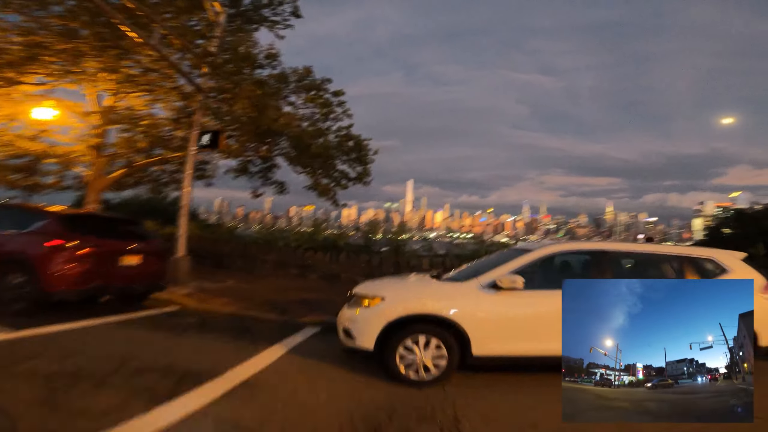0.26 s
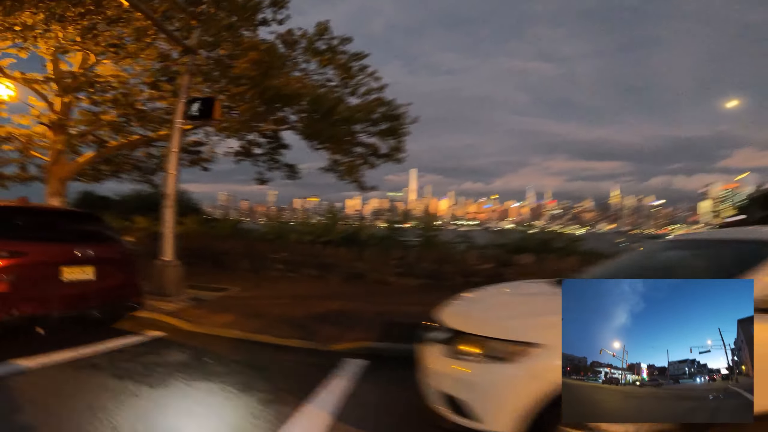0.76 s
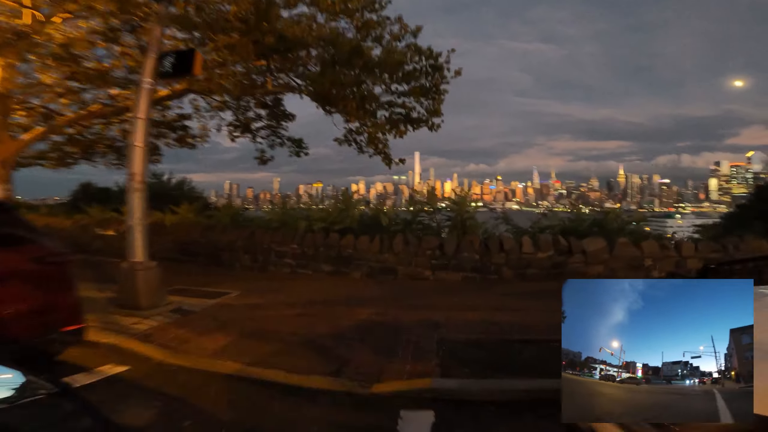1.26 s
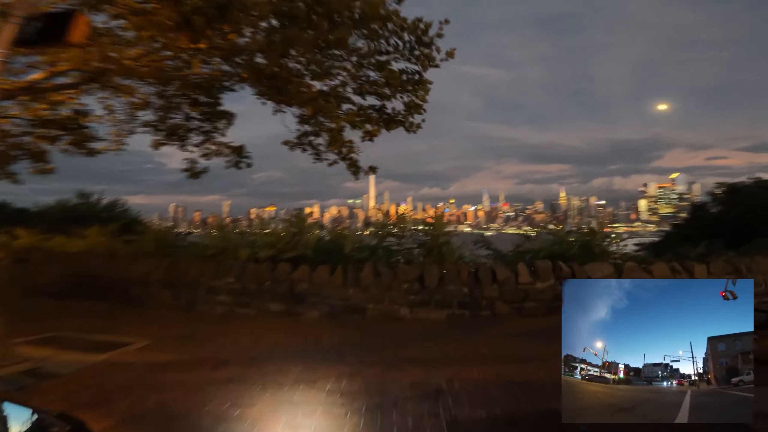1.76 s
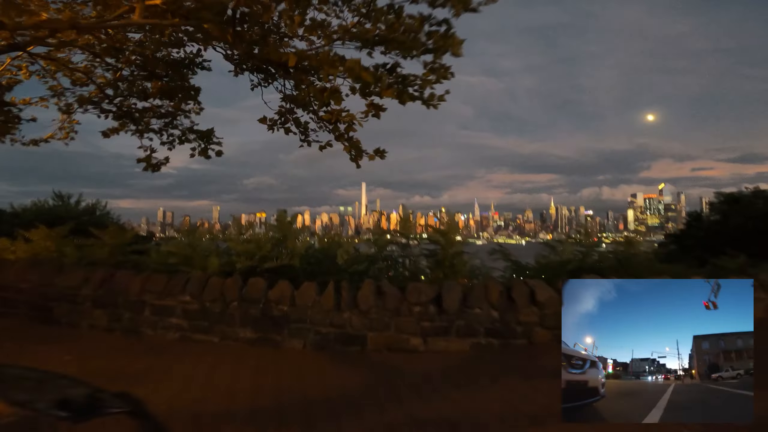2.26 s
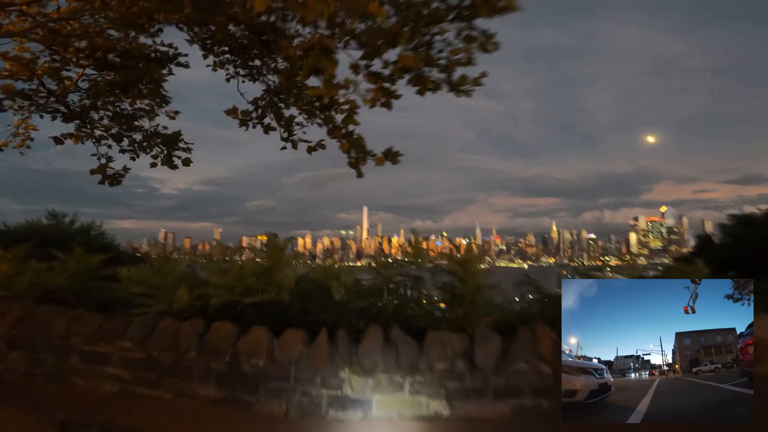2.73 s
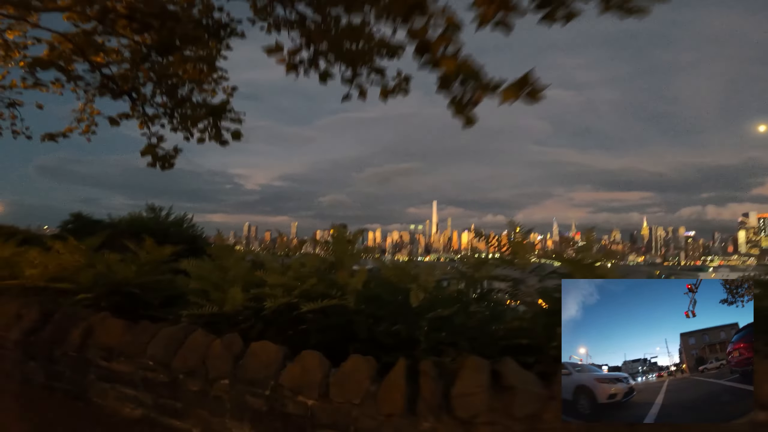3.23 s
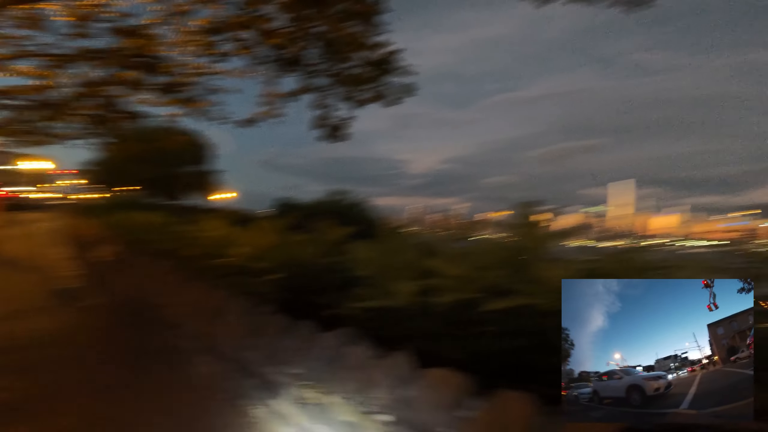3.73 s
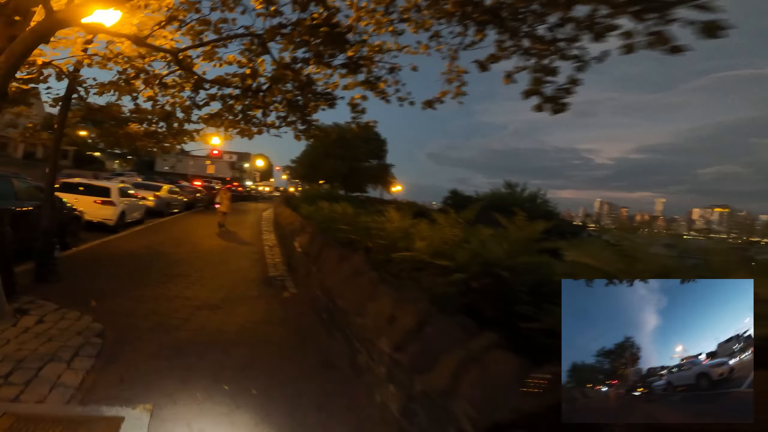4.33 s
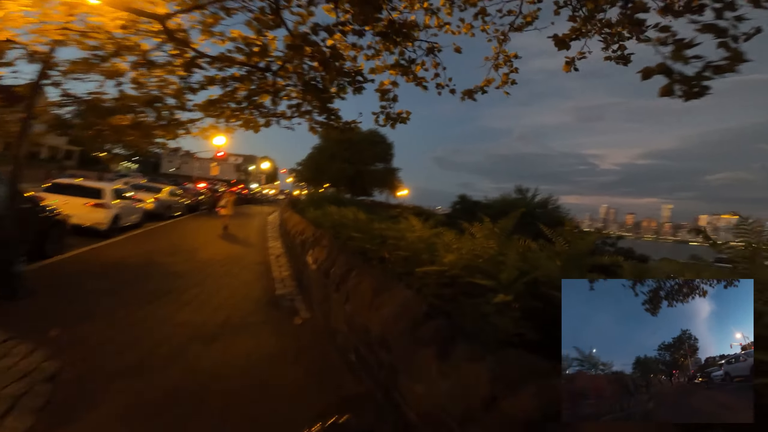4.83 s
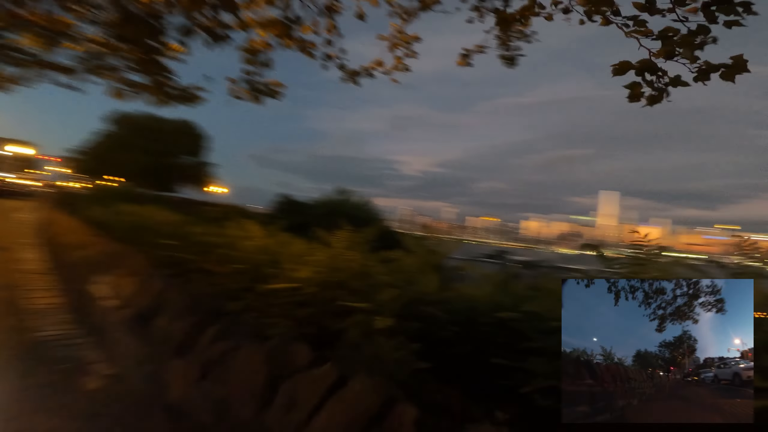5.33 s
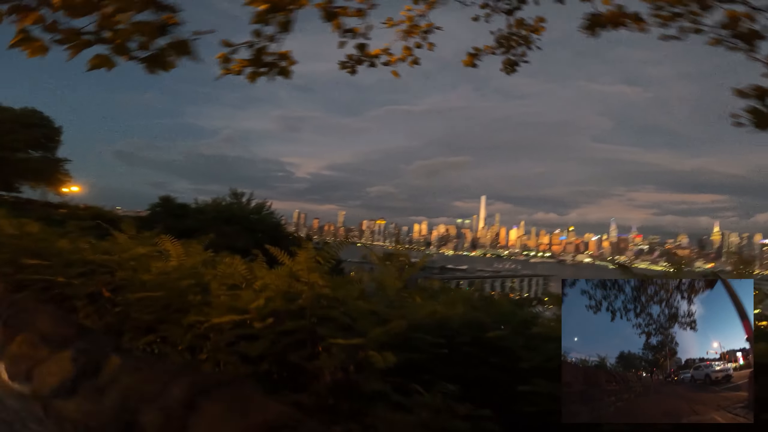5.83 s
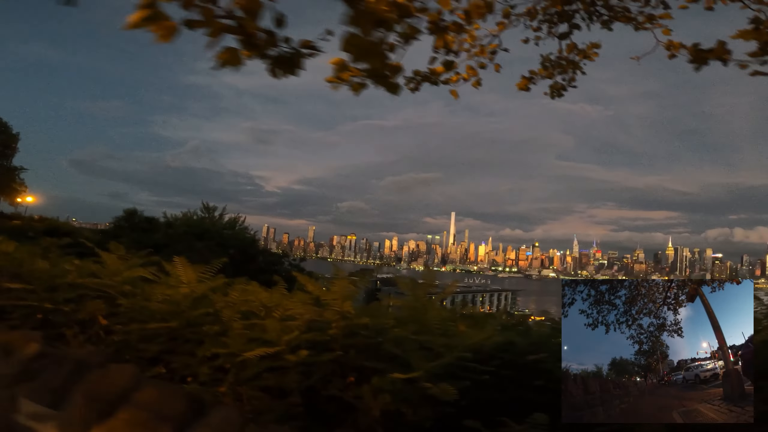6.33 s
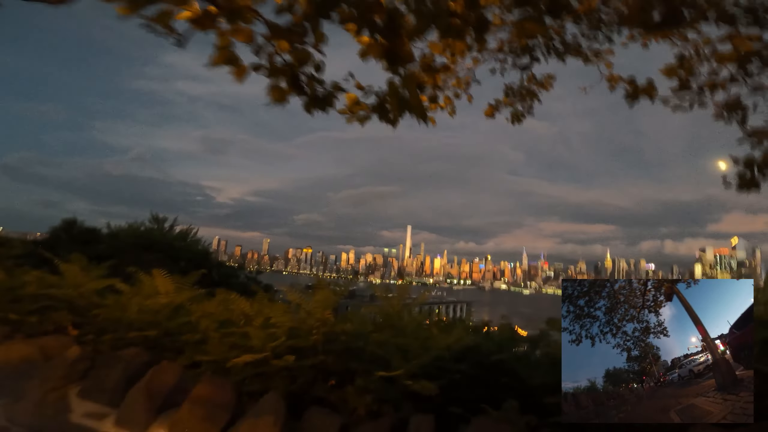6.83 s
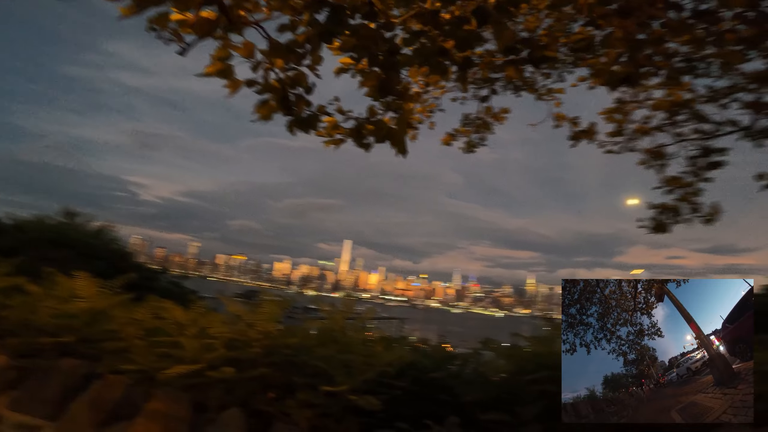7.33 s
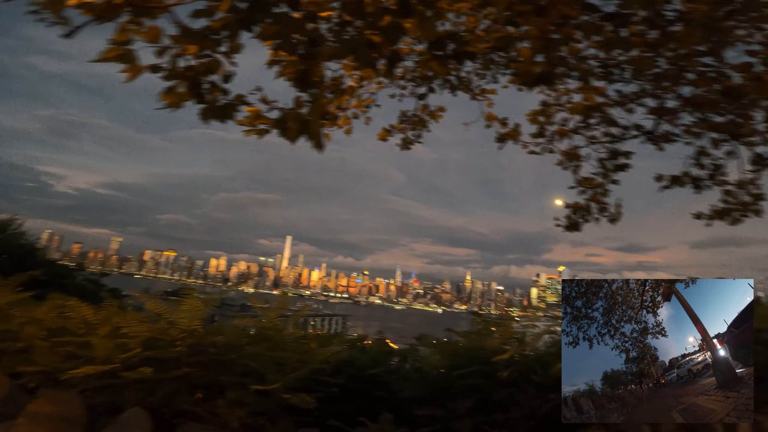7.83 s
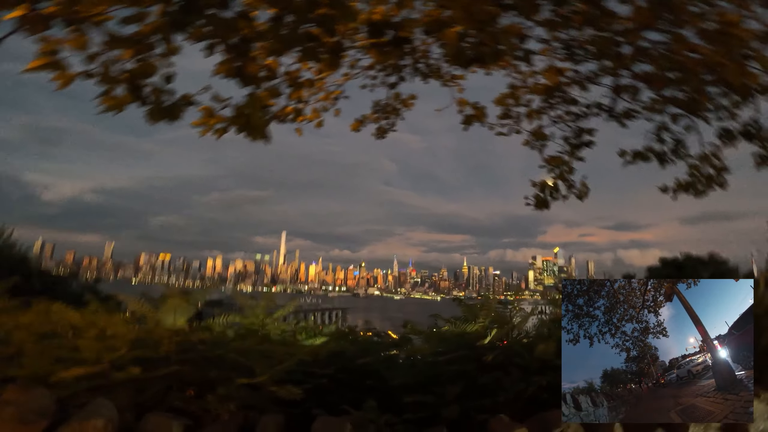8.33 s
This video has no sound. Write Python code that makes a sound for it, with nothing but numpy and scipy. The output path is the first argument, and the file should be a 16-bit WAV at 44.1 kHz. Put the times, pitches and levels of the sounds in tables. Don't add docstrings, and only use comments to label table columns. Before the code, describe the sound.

Close on a bike outdoors, a loud pure brake squeal opens, already under way; a second, harder one follows just after one second, with thin, higher beaded squeals trailing. A short squeal returns before four seconds with a sharp burst of metal clacks and pings. Clicks, frame knocks, faint ratchet ticks, a grainy pad scrape and a final snap follow. A low diesel idles throughout under wind and street rumble, dipping after each loud squeal.

```python
import sys
import numpy as np
from scipy import signal
from scipy.io import wavfile
from scipy.ndimage import uniform_filter1d

SR = 44100
rng = np.random.default_rng(int(sys.argv[2]) if len(sys.argv) > 2 else 0)


def inscribe(sig):
    pcm = np.round(np.clip(np.atleast_2d(sig).T, -1, 1) * 32767)
    wavfile.write(sys.argv[1], SR, pcm.astype(np.int16))


def how_loud(loudness_db):
    steps = np.asarray(loudness_db, float) / 20
    return 10 ** steps


N = 378378

# (time [s], pitch [Hz], level [dB], octave [dB])
FRONT_SQUEALS = [
    [(0, 1530, -16, -25), (.064, 1530, -16, -28), (.085, 1525, -21, -18), (.108, 1511, -17.5, -30),
     (.142, 1530, -13.5, -30), (.168, 1515, -20.5, -23.5), (.208, 1510, -24.5, -36), (.235, 1525, -40, -45),
     (.31, 1500, -57, -58)],
    [(1.32, 1557, -41.5, -60), (1.346, 1558, -14.5, -34), (1.372, 1541, -11.5, -35),
     (1.392, 1530, -15.5, -32.5), (1.44, 1529, -14.5, -39.5), (1.472, 1513, -17, -28.5),
     (1.488, 1523, -20.5, -41), (1.515, 1506, -27, -33), (1.555, 1520, -43, -56)],
]
# (time [s], pitch [Hz], level [dB], octave [dB])
RELEASE_SQUEAKS = [
    [(.17, 1335, -54.5, -73), (.21, 1344, -39, -70), (.245, 1335, -48, -70), (.29, 1330, -65, -85)],
    [(1.49, 1345, -54, -75), (1.53, 1335, -35, -54), (1.565, 1327, -27, -46), (1.585, 1320, -43, -60),
     (1.605, 1316, -32, -58), (1.63, 1320, -41, -62), (1.67, 1305, -55, -78)],
]
DISC_FED_DB = [-2.5, 0]
# (pitch [Hz], level [dB], t60 [s])
DISC_MODES = [(1555, 20.5, 0.9), (1614, 6, 2.3), (1500, 10, 0.99)]
# (time [s], held [s], level [dB])
PAD_HISS = [
    (0.0, 0.22, -50),
    (1.351, 0.17, -53),
]
# (time [s], held [s], pitch [Hz], level [dB], octave re level [dB])
REAR_CHIPS = [
    (.47, 0.017, 2390, -44, -30),
    (.92, 0.0083, 2430, -45, -30),
    (.965, 0.0065, 2380, -45.5, -30),
]
# (time [s], pitch [Hz], level [dB], octave [dB])
REAR_SQUEALS = [
    [(1.11, 2471, -55, -72), (1.16, 2470, -45, -62), (1.196, 2476, -32, -49), (1.235, 2467, -43, -59),
     (1.252, 2486, -33, -48), (1.285, 2450, -48, -64), (1.298, 2460, -41, -86), (1.318, 2500, -43, -83),
     (1.335, 2482, -58, -71)],
    [(1.53, 2405, -60, -78), (1.566, 2405, -45, -77), (1.65, 2426, -45.5, -78), (1.672, 2380, -48, -52.5),
     (1.708, 2380, -47, -64), (1.75, 2380, -37, -57), (1.766, 2403, -45, -57), (1.788, 2400, -43, -56),
     (1.8, 2390, -47, -57)],
    [(1.79, 2405, -45, -58), (1.804, 2380, -42, -51), (1.83, 2396, -40, -60), (1.85, 2400, -34.5, -56),
     (1.868, 2402, -48, -69), (1.906, 2400, -35, -65), (1.918, 2403, -47, -59), (1.94, 2407, -39, -56),
     (1.98, 2370, -45, -60)],
    [(1.97, 2380, -49, -63), (1.996, 2400, -35.5, -58), (2.016, 2380, -42, -53),
     (2.076, 2397, -29.5, -46.5), (2.1, 2425, -46, -55), (2.116, 2374, -36, -64), (2.122, 2430, -34, -82),
     (2.13, 2420, -40, -54), (2.17, 2390, -47, -75)],
    [(2.16, 2430, -43, -73), (2.176, 2420, -50, -79), (2.184, 2380, -47, -56), (2.21, 2333, -36, -56),
     (2.262, 2440, -60, -86), (2.29, 2423, -50, -69), (2.306, 2376, -47, -87), (2.338, 2384, -46, -75),
     (2.38, 2413, -59, -85)],
    [(3.72, 2350, -51, -64), (3.75, 2399, -34, -63), (3.774, 2393, -27.5, -46), (3.804, 2395, -32, -46),
     (3.856, 2400, -26.5, -48), (3.896, 2440, -32, -50), (3.906, 2370, -41, -67), (3.908, 2420, -30, -52),
     (3.915, 2467, -36, -44)],
]
# (time [s], held [s], pitch [Hz], level [dB])
PAD_WHISTLES = [
    (.772, .01, 13220, -63),
    (1.074, 0.024, 13200, -60),
    (1.274, 0.023, 13200, -60.5),
    (1.94, .05, 13220, -75),
    (5.77, .03, 13200, -65),
    (6.102, .008, 13300, -52),
    (6.25, .04, 13260, -47),
    (6.33, .06, 13400, -75),
]
# (time [s], held [s], pitch [Hz], level [dB])
SPRING_CHIRPS = [(4.13, .03, 5450, -67), (4.3, .025, 5450, -64), (4.345, .012, 5200, -54),
                 (4.366, .012, 5400, -58), (4.49, .006, 5500, -63), (4.565, .045, 5200, -59),
                 (4.59, .015, 5450, -60), (4.62, .015, 5350, -62), (4.65, .045, 5420, -60),
                 (4.708, .01, 5330, -58), (4.73, .025, 5330, -59), (4.765, .015, 5240, -64),
                 (4.875, .012, 5460, -55), (5.395, .03, 5450, -65), (5.515, .008, 5500, -60),
                 (5.56, .04, 5500, -66), (6.885, .014, 5500, -56)]
# (time [s], held [s], mode [Hz], level [dB])
PAD_DRAGS = [
    (7.008, .24, 2600, -47),
    (7.272, 0.18, 2620, -50.5),
    (7.44, .05, 2580, -54.5),
    (7.535, .065, 2575, -52),
]
# (time [s], held [s], mode [Hz], level [dB])
DRAG_SIDE_MODES = [
    (7.01, .3, 5020, -61),
    (7.36, .12, 5050, -59),
    (7.05, .5, 3942, -62),
    (7.01, .28, 8450, -68),
    (6.96, .02, 6300, -59),
]
# (time [s], peak [dB], ring [Hz])
LEVER_TICKS = [
    (0.5193, -45, 2930),
    (0.6972, -34.5, 3400),
    (0.837, -25, 3200),
    (1.77, -25.5, 2400),
    (4.2052, -16.5, 3440),
    (4.4114, -20, 3480),
    (4.895, -17.5, 3350),
    (4.909, -27.5, 2450),
    (5.8485, -44.5, 2634),
    (6.96, -41, 2620),
]
# (time [s], peak [dB], ring [Hz])
RATCHET_PIPS = [
    (.204, -32, 3320),
    (3.867, -33, 3500),
    (4.134, -29.5, 2890),
    (4.1639, -29, 2660),
    (4.1845, -27, 3120),
    (4.2577, -31, 3310),
    (4.721, -29.5, 2700),
    (6.037, -30, 2579),
    (8.032, -39, 3508),
]
# (time [s], peak [dB], ring [Hz])
CABLE_TAPS = [
    (3.4958, -44, 2580),
    (3.6565, -40, 2520),
    (4.0308, -29, 3190),
    (4.5016, -40, 2660),
    (4.5897, -32, 2680),
    (4.639, -34.5, 2940),
    (4.6871, -39, 2620),
    (4.8133, -38, 3320),
]
# (time [s], peak [dB], ring [Hz], knock re peak [dB])
METAL_CLACKS = [
    (2.281, -33, 3450, -22),
    (3.889, -25.5, 3530, -20),
    (3.906, -19.5, 2960, 1),
    (3.9121, -13.5, 4100, -16),
    (3.926, -18.5, 3900, -18),
    (5.3901, -30, 3500, -8),
    (6.6415, -30.5, 2700, -8),
    (7.9134, -26, 3840, -14.5),
    (7.9255, -13, 3440, -6.5),
]
# (time [s], peak [dB], knock [Hz], knock re peak [dB])
FRAME_KNOCKS = [(0.762, -27.5, 1500, 1), (1.0688, -47.5, 890, 15), (3.299, -34, 1054, -4),
                (3.686, -26, 1370, 1), (3.706, -23.5, 1530, 3.5), (4.0174, -29.5, 794, 9.5),
                (4.0255, -23.5, 790, 6.5), (4.051, -39, 1000, -9), (4.588, -36.5, 974, 6.5),
                (4.721, -33.5, 1050, 14.5), (5.355, -41, 1060, 7), (6.065, -19, 1620, 1),
                (6.097, -30.5, 1210, 8), (6.1136, -30, 1270, 0), (6.13, -32, 1320, 8),
                (6.171, -24, 900, 3.5), (6.2122, -20, 1720, 2), (6.295, -20.5, 1330, 0),
                (7.237, -39, 2600, -4), (7.881, -32, 994, -1), (7.927, -22, 1500, 1.5),
                (7.937, -26.5, 1930, -4)]
# (time [s], peak [dB], ring [Hz], ring re peak [dB])
TUBE_BUMPS = [
    (5.5535, -31, 1570, 10),
    (5.6, -40, 1590, 16),
    (5.617, -19, 1586, 1),
]
# (time [s], peak [dB], left re right [dB])
CATCH_SNAPS = [
    (3.9121, -9, -4),
    (3.9284, -6, -4),
    (7.881, -33, -1),
    (7.9248, -7, -6),
]
# (time [s], peak [dB], ring [Hz], t60 [s])
BRACKET_PINGS = [
    (3.584, -31, 3900, 0.046),
    (3.59, -35, 4020, 0.041),
    (3.9127, -16.5, 3940, 0.05),
    (3.9155, -14, 3950, 0.048),
    (3.9339, -15, 3840, 0.025),
    (3.943, -34, 4000, 0.06),
    (4.507, -44, 4050, 0.046),
]
# (multiple of the firing rate [1], level [dB])
IDLE_OVERTONES = [(1, -6.5), (2, 5), (3, 0.5), (4, -1), (5, -4), (6, -4.5), (7, -10), (8, -12.5), (9, -13),
                  (10, -17), (11, -21), (12, -17.5), (13, -22), (14, -28.5), (15, -24.5), (16, -32.5)]
# (time [s], rate [Hz])
FIRING_RATE = [(0, 33.93), (1.098, 33.9), (2.6, 34.34), (3.599, 33.68), (8.58, 33.71)]
STRONG_DB = [-34, -32.5, -36.5, -36, -38.5]
# (centre [s], half width [s], level [dB])
REFLECTION_SWELLS = [
    [(.65, 0.87, 8), (1.43, 0.11, 10.5), (2.1, 0.42, 2.5), (4.1, 0.091, 6), (4.52, 0.21, 4.5),
     (5.85, 0.28, 3.5)],
    [(0, 0.041, 13.5), (.85, 0.17, 5.5), (1.25, 0.076, -16), (3.05, 0.23, 7.5), (4.52, 0.44, -9),
     (4.97, 0.21, 8.5), (6.1, 0.29, 4.5), (8.55, 0.33, 4.5)],
    [(.6, 1, -6.5), (1.43, 0.11, 17), (2.5, 0.44, 8), (3.7, 0.3, -3), (4.6, 0.45, 5), (7.0, 0.53, 4),
     (8.4, 0.39, -13)],
    [(.55, 0.25, 5), (1.25, 0.096, -8), (3.7, 0.15, -17), (4.2, 0.15, -5), (4.97, 0.21, -15),
     (5.5, 0.25, 5.5), (6.6, 0.67, 3.5)],
    [(.1, 0.46, 8.5), (.55, 0.14, -17), (2.1, 0.22, -1.5), (3.75, 0.11, -8), (4.22, 0.064, -11),
     (4.75, 0.63, 4), (5.8, 0.99, 3), (8.4, 0.46, -3.5)],
]
# (time [s], peak [dB])
FREEWHEEL_TICKS = [(5.0102, -58), (5.2896, -58.5), (5.321, -60.5), (5.353, -58), (5.3913, -56),
                   (5.4427, -53), (5.4701, -52.5), (5.5001, -51.5), (5.5629, -54), (5.618, -45),
                   (5.7101, -58), (5.7505, -57.5), (5.7979, -52), (5.8498, -49), (5.8912, -53),
                   (5.978, -57), (6.0189, -58), (6.0418, -49.5)]
# (time [s], peak [dB])
LATE_FREEWHEEL_TICKS = [(6.3667, -57), (6.6192, -58), (6.794, -49.5), (6.9529, -53.5), (6.9774, -50),
                        (7.0088, -51.5), (7.0332, -51.5), (7.1111, -53), (7.144, -46.5), (7.2168, -52.5),
                        (7.2747, -53.5), (7.3191, -55), (7.343, -56), (7.3715, -57.5), (7.4248, -57),
                        (7.4573, -56), (7.4937, -53.5), (7.5361, -59), (7.591, -53.5), (7.6957, -60)]
# (start [s], held [s], level [dB])
WHEEL_RUSTLE = [
    (3.75, .4, -71),
    (4.25, 1.2, -65),
    (5.85, 0.51, -73),
    (6.96, 0.49, -63),
    (7.5, .4, -80),
]
# (centre [s], half width [s], level [dB])
GUSTS = [
    (1.05, 0.39, -1),
    (1.45, 0.065, -0.5),
    (1.85, 0.11, -2.5),
    (2.75, 0.28, 2),
    (4.3, 0.23, 0.5),
    (5.3, 0.17, 0),
    (6.36, .15, -1.5),
    (7.55, 0.22, -0.5),
    (8.55, 0.18, 0),
]
# (centre [s], half width [s], level [dB])
RUBS = [(0.03, 0.19, 11), (.35, 0.3, -3.5), (1.36, 0.051, 1), (2.0, 0.25, 3), (3.1, 0.64, 1.5),
        (4.0, 0.35, 1.5), (4.62, 0.067, 4), (5.61, 0.23, 10), (6.17, 0.17, 13), (7.08, 0.064, 2.5),
        (7.3, 0.13, -1.5)]
# (frequency [Hz], level per Hz [dB])
TOWN_SPECTRUM = [(12, -35), (20, -2), (43, 3), (71, -5.5), (106, -1.5), (125, -9), (169, -6), (507, -18),
                 (666, -26.5), (1030, -19.5), (2410, -32.5), (3850, -35), (13900, -74)]
# (frequency [Hz], likeness [0-1])
PORT_LIKENESS = [(60, 1), (130, 0.97), (280, 1), (610, 0.81), (1320, 0.79), (2870, 0.57), (6220, 0),
                 (13500, 1)]
# (time [s], depth [dB])
GAIN_DUCKS = [
    (0.0, 9),
    (1.353, 12),
]


def brakes():
    front_grip = dict(flutter_db=.5, rough=.08, wobble=.0007)
    front = squeal(FRONT_SQUEALS[:1], **front_grip, top_db=[-30, -35, -47], top_rough=0.4)
    front = front + squeal(FRONT_SQUEALS[1:], **front_grip, top_db=[-28, -35, -47], top_rough=0.34)
    ringing = how_loud(-30.0 + 1.7 * walk(25)) * free_disc()
    release = squeal(RELEASE_SQUEAKS, flutter_db=.8, rough=.2, wobble=.002)
    chirps = held_notes(SPRING_CHIRPS, attack_s=0.012, release_s=0.023, depth_db=8.1, fade_db_s=15, sag_hz_s=1)
    spring = squeal(chirps, flutter_db=2.0, rough=.85, wobble=.006)
    rear = rear_disc() + pad_drag()
    lagged = np.array([np.roll(rear, 3), rear])
    tones = pan(front + ringing + release + spring, -3.5) + pan(lagged, -7.0)
    return walls(tones, 0.13, -21.0) + pad_hiss() + pad_whistle()


def free_disc():
    drive = np.zeros(N)
    for table, fed_db in zip(FRONT_SQUEALS, DISC_FED_DB):
        i, (_, level_db, _) = read(table)
        drive[i] = how_loud(level_db + fed_db)
    t = np.arange(N) / SR
    return sum(how_loud(db) * ring(drive * np.sin(2 * np.pi * hz * t), hz, t60) for hz, db, t60 in DISC_MODES)


def rear_disc():
    chips = held_notes(REAR_CHIPS, attack_s=0.05, release_s=0.04, depth_db=27, fade_db_s=3, sag_hz_s=-37)
    return squeal(chips + list(REAR_SQUEALS), flutter_db=1.0, rough=.15, wobble=.0008,
                  top_db=[-12, -27, -27.5], top_rough=0.15, top_count=1)


def pad_drag():
    out = np.zeros(N)
    for table in held_notes(PAD_DRAGS + DRAG_SIDE_MODES, attack_s=.008, release_s=0.022, depth_db=14,
                            fade_db_s=8, sag_hz_s=0):
        i, (hz, db) = read(table)
        throb_hz = 62 * (1 + .15 * walk(22, size=len(i)))
        throb_db = 4.3 * np.cos(2 * np.pi * np.cumsum(throb_hz) / SR)
        out[i] += how_loud(db + throb_db) * unit(ring(rng.standard_normal(len(i)), hz[0], .032))
    return out


def pad_hiss():
    scrape = np.zeros(N)
    rows = [(s, held, 0, db) for s, held, db in PAD_HISS]
    for table in held_notes(rows, attack_s=0.053, release_s=0.066, depth_db=22, fade_db_s=30, sag_hz_s=0):
        i, (_, db) = read(table)
        scrape[i] = how_loud(db + 2.6 * walk(130, size=len(i)))
    air = rng.standard_normal((2, N))
    bright = unit(dull(band(air, 4000, 10000, order=1), 12000))
    harsh = how_loud(14.0) * unit(band(air, 2000, 4980))
    return walls(scrape * (bright + harsh), 0.088, -7)


def pad_whistle():
    tables = held_notes(PAD_WHISTLES, attack_s=.045, release_s=.07, depth_db=35, fade_db_s=60, sag_hz_s=0)
    tone = squeal(tables, flutter_db=1.5, rough=.7, wobble=.003)
    return walls(pan(np.array([tone, np.roll(tone, -1)]), -4), .06, 2)


def squeal(tables, flutter_db, rough, wobble, top_db=(), top_rough=0.83, flutter_hz=45, top_count=0):
    out = np.zeros(N)
    for table in tables:
        i, (hz, *levels_db) = read(table)
        size = len(i)
        phase = 2 * np.pi * np.cumsum(hz * (1 + wobble * walk(60, size))) / SR
        from_start = i - i[0] + 200 * (i[0] == 0)
        fade = np.minimum(np.minimum(from_start, i[-1] - i) / 200, 1)
        levels_db = levels_db + [levels_db[top_count] + over_db for over_db in top_db]
        for k, level_db in enumerate(levels_db):
            share = top_rough if k else rough
            grip = (1 + share * walk(240, size)) / np.sqrt(1 + share ** 2)
            slip = share * walk(120, size)
            beads = how_loud(level_db + flutter_db * walk(flutter_hz, size))
            out[i] += np.sqrt(2) * beads * grip * np.sin((k + 1) * phase + slip) * fade
    return out


def held_notes(rows, attack_s, release_s, depth_db, fade_db_s, sag_hz_s):
    tables = []
    for s, held, hz, db, *octave in rows:
        times = s + np.array([-attack_s, 0, held, held + release_s])
        pitch = hz - sag_hz_s * np.array([-attack_s, 0, held, held])
        fade_db = fade_db_s * held
        grip_db = np.array([-depth_db, 0, -fade_db, -fade_db - depth_db])
        overtone = [db + re_db + np.array([-depth_db, 0, 0, -depth_db]) for re_db in octave]
        tables.append(np.transpose([times, pitch, db + grip_db, *overtone]))
    return tables


def clicks():
    out, t = np.zeros((2, N + SR)), np.arange(SR // 5) / SR
    for s, db, hz, low_db, low_hz, hollow, high_db, rise, rattle, tone, snap in blows():
        mid, side, chatter = rng.standard_normal((3, len(t)))
        grains = how_loud(2.4 * unit(uniform_filter1d(chatter, size=50)))
        envelope = np.minimum(t / rise, 1) * np.exp(-t / rattle)
        air = (mid + 0.44 * side * np.array([[1], [-1]])) * grains * envelope
        snapped = air * (1 + snap * np.exp(-t / 0.00043))
        body = dull(band(snapped, 1480, 5730, order=3) + tone * ring(air, hz, 0.01), 4100)
        knock = dull(band(air, 720, 2410) + hollow * ring(air, low_hz, 0.037), 2560)
        sharp = air * (1 + 1.4 * np.exp(-t / 0.0018))
        tick = dull(band(sharp, 5850, 9400, order=1), 13000)
        blow = crest(body) + how_loud(low_db) * crest(knock) + how_loud(high_db) * pan(crest(tick), 4.5)
        k = int(s * SR)
        out[:, k:k + len(t)] += how_loud(db + 2.5) * blow
    return walls(pan(out[:, :N], -4.0), 0.19, -12.0)


def blows():
    return ([(s, db, hz, -10, 1050, 3.8, -4, .002, .0085, 2.2, 1.5) for s, db, hz in LEVER_TICKS]
            + [(s, db, hz, -8, 1050, 3.8, -12, .0008, .0025, 1.5, 2.5) for s, db, hz in RATCHET_PIPS]
            + [(s, db, hz, -12, 1050, 3.8, -24, .001, .004, 5.0, 0.6) for s, db, hz in CABLE_TAPS]
            + [(s, db, hz, low_db, 1350, 3.8, -16, .0006, .0085, 4.0, 2.5) for s, db, hz, low_db in METAL_CLACKS]
            + [(s, db, 2350, low_db, hz, 1.6, -22, .0025, .014, 4.0, .3) for s, db, hz, low_db in FRAME_KNOCKS]
            + [(s, db, 2450, low_db, hz, 6.0, -22, .005, .014, 5.0, .3) for s, db, hz, low_db in TUBE_BUMPS])


def snaps():
    out = np.zeros((2, N))
    for s, db, pan_db in CATCH_SNAPS:
        out[:, int(s * SR)] = pan(how_loud(db), pan_db)[:, 0]
    push = np.eye(1, SR // 10)[0]
    crack = -crest(dull(band(push, 1700, 4200, order=1), 8100))
    return walls(signal.fftconvolve(out, crack[None], axes=1)[:, :N], 0.17, -10.5)


def pings():
    out, t = np.zeros(N), np.arange(SR // 5) / SR
    for s, db, hz, t60 in BRACKET_PINGS:
        k = int(s * SR)
        out[k:k + len(t)] += how_loud(db - 60 * t / t60) * np.minimum(t / 0.0011, 1) * np.sin(2 * np.pi * hz * t)
    return walls(pan(np.array([np.roll(out, 2), out]), -4.0), 0.081, -14)


def grit(high_db):
    grain_db = 2.0 * rng.standard_normal(N) + .7 * (high_db + 60.0) - 77.0
    hits = (rng.random(N) < 60 / SR) * how_loud(grain_db)
    for s, db in list(FREEWHEEL_TICKS) + list(LATE_FREEWHEEL_TICKS):
        hits[int(s * SR)] += how_loud(min(db, -51.0) - 4.0)
    smear = signal.lfilter([1], [1, -np.exp(-1 / (0.0055 * SR))], hits)
    return smear * unit(band(rng.standard_normal((2, N)), 4500, 13000, order=1))


def rustle():
    swell = np.zeros(N)
    rows = [(s, held, 0, db) for s, held, db in WHEEL_RUSTLE]
    for table in held_notes(rows, attack_s=.02, release_s=.1, depth_db=14, fade_db_s=4, sag_hz_s=0):
        i, (_, db) = read(table)
        swell[i] += how_loud(db + 1.2 * walk(25, size=len(i)))
    return swell * unit(band(rng.standard_normal((2, N)), 6500, 12500, order=1))


def diesel(low_db, gain_db):
    hz = np.interp(np.arange(N) / SR, *np.transpose(FIRING_RATE))
    phase = 2 * np.pi * np.cumsum(hz * (1 + 0.00315 * walk(12))) / SR
    levels_db = {k: low_db + db - 9.0 + 2.06 * walk(2.598) for k, db in IDLE_OVERTONES}
    for k, db, rows in zip((2, 3, 4, 5, 6), STRONG_DB, REFLECTION_SWELLS):
        levels_db[k] = db + gain_db + bumps(rows)
    out = np.zeros(N)
    for k, db in levels_db.items():
        out += np.sqrt(2) * how_loud(db + 1.0 * walk(11)) * np.sin(k * phase + .5 * walk(3))
    return out


def town(low_db, mid_db, high_db):
    out = 0
    for hz in 24 * 2 ** np.arange(0, 9.3, .5):
        mid, side = band(rng.standard_normal((2, N)), hz / 2 ** 0.38, hz * 2 ** 0.17)
        wind_likeness = np.interp(hz, [30, 110], [.55, 1])
        like = np.clip(on_log(PORT_LIKENESS, hz) * wind_likeness, 0, .99)
        share = np.interp(np.log2(hz), np.log2([250, 800, 2500, 7000]), [0, 1, 1.3, 2])
        gain_db = 0
        for k, curve_db in enumerate((low_db, mid_db, high_db)):
            gain_db = gain_db + np.clip(1 - abs(share - k), 0, 1) * (curve_db - np.median(curve_db))
        gain_db = gain_db * np.interp(hz, [7000, 13000], [1, 1.4])
        flicker_db = 0.63 * walk(3.107) + 1.3 * walk(18)
        pair = np.sqrt(1 + like) * mid + np.sqrt(1 - like) * side * np.array([[1], [-1]])
        pan_db = np.interp(hz, [300, 2000], [-.3, -2.5])
        out = out + how_loud(on_log(TOWN_SPECTRUM, hz) + gain_db + flicker_db) * pan(pair, pan_db)
    return unit(out)


def walls(x, t60, wet_db):
    t = np.arange(SR // 3) / SR
    decay = np.exp(-np.log(1000) * t / t60) * (t > .004)
    tail = dull(rng.standard_normal((2, len(t))), 12000) * decay
    return x + how_loud(wet_db) * signal.fftconvolve(x, tail / np.sqrt(np.sum(tail[0] ** 2)), axes=1)[:, :N]


def unit(x):
    return x / np.sqrt(np.mean(x ** 2))


def crest(x):
    return x / np.abs(x).max()


def band(x, lo_hz, hi_hz, order=2):
    return signal.sosfilt(signal.butter(order, [lo_hz, hi_hz], "band", fs=SR, output="sos"), x)


def dull(x, hz):
    return signal.sosfilt(signal.butter(2, hz, fs=SR, output="sos"), x)


def ring(x, hz, t60):
    r = np.exp(-np.log(1000) / (t60 * SR))
    return signal.lfilter([1 - r, 0, r - 1], [1, -2 * r * np.cos(2 * np.pi * hz / SR), r * r], x)


def pan(x, pan_db):
    return x * how_loud(np.array([[.5], [-.5]]) * pan_db)


def walk(rate, size=N):
    k = max(int(SR / rate), 1)
    steps = np.repeat(rng.standard_normal(size // k + 1), k)
    return 1.72 * uniform_filter1d(uniform_filter1d(steps, k), k)[:size]


def bumps(rows):
    t = np.arange(N) / SR
    return sum(db * np.exp(-((t - s) / half) ** 2) for s, half, db in rows)


def read(table):
    s, *columns = np.transpose(table)
    i = np.arange(max(int(s[0] * SR), 0), min(int(s[-1] * SR), N))
    return i, [np.interp(i / SR, s, c) for c in columns]


def on_log(table, hz):
    f, v = np.transpose(table)
    return np.interp(np.log(hz), np.log(f), v)


def camera_gain():
    wait_s, recover_db_per_s = 0.14, 6
    t, gain_db = np.arange(N) / SR, np.zeros(N)
    for s, depth_db in GAIN_DUCKS:
        climb_db = np.minimum(recover_db_per_s * np.maximum(t - s - wait_s, 0) - depth_db, 0)
        gain_db = np.where(t >= s, climb_db, gain_db)
    return uniform_filter1d(gain_db, size=600)


def scene():
    gain_db = camera_gain()
    traffic_arrives_s, traffic_rise_s, traffic_db = 4.84, 0.14, 2
    arrival = np.tanh((np.arange(N) / SR - traffic_arrives_s) / traffic_rise_s)
    low_db = -25 + gain_db + bumps(GUSTS)
    mid_db = -41.5 + gain_db + traffic_db / 2 * (1 + arrival)
    high_db = -60.5 + 0.3 * gain_db + bumps(RUBS)
    bike = brakes() + clicks() + snaps() + pings() + grit(high_db) + rustle()
    return bike + diesel(low_db, gain_db) + how_loud(-29.5) * town(low_db, mid_db, high_db)


def roll_off(x):
    return signal.sosfilt(signal.butter(12, 15700, fs=SR, output="sos"), x)


def record(dry):
    bass = uniform_filter1d(dry[1], size=9)
    right = np.roll(dry[1] - bass + np.roll(bass, 1), 1)
    ports = np.array([dry[0], right])
    cut = signal.sosfilt(signal.ellip(8, .2, 70, 15700, fs=SR, output="sos"), ports)
    return roll_off(cut)


dry = scene()
out = record(dry)
inscribe(out)
```